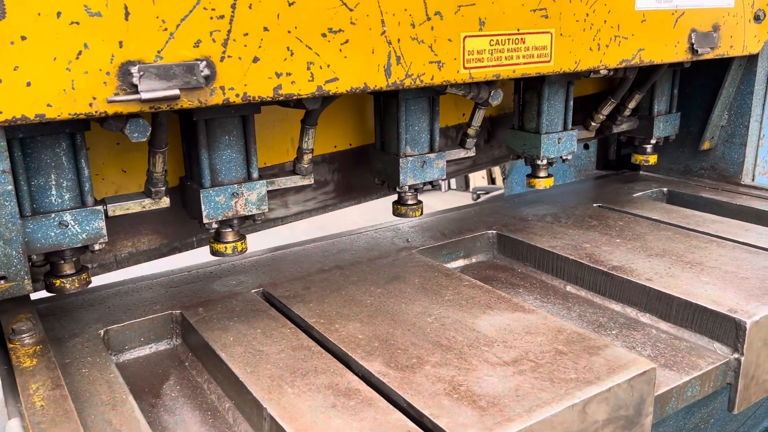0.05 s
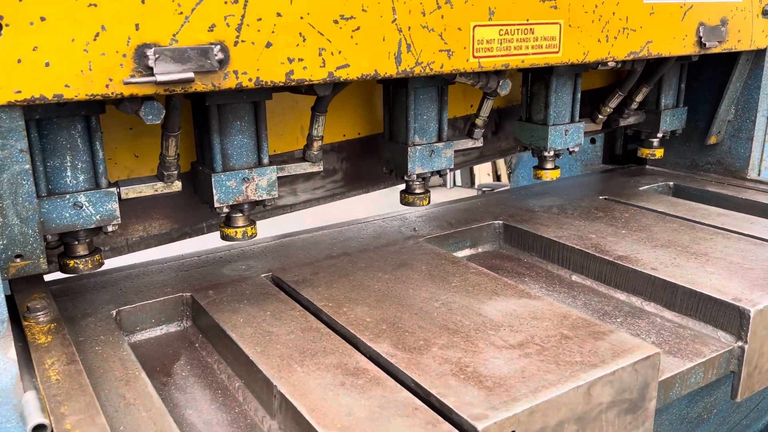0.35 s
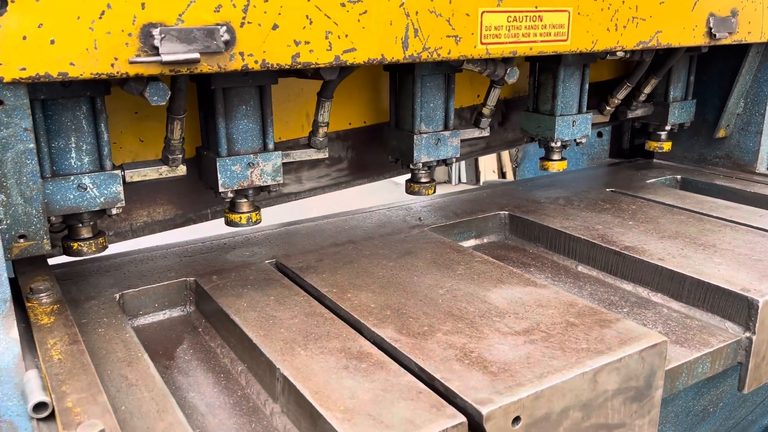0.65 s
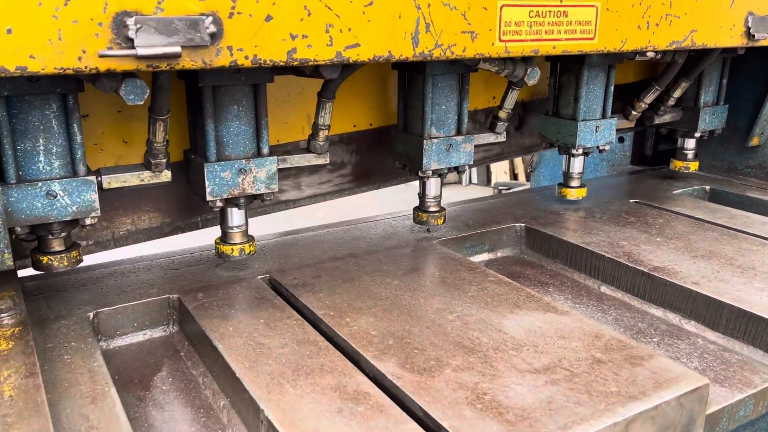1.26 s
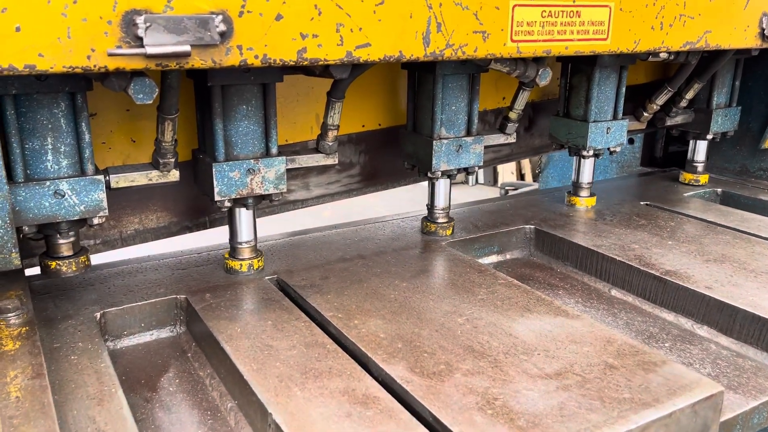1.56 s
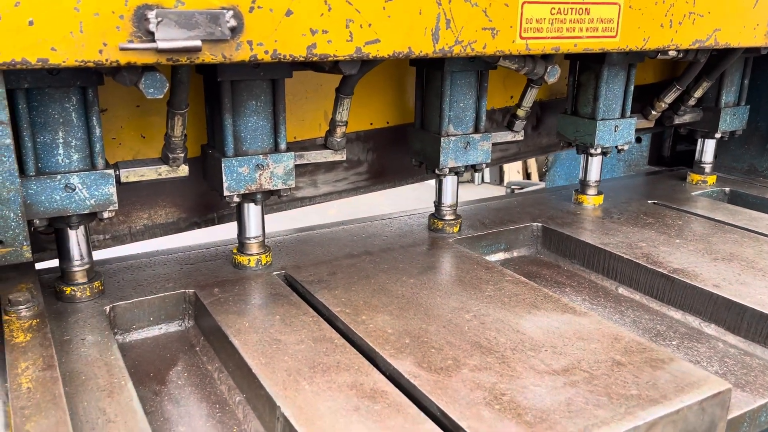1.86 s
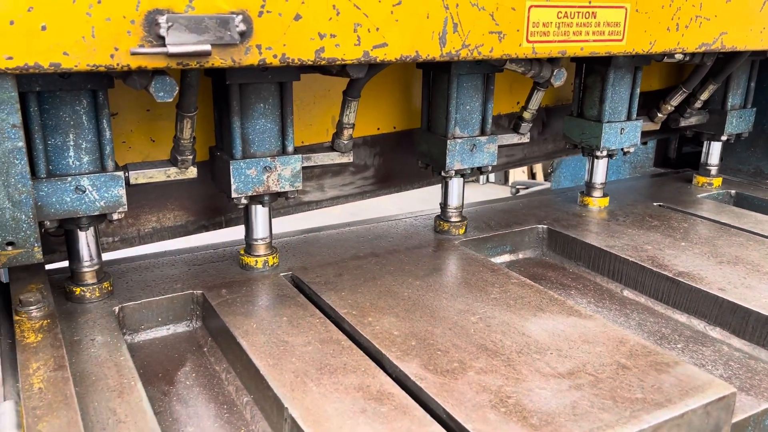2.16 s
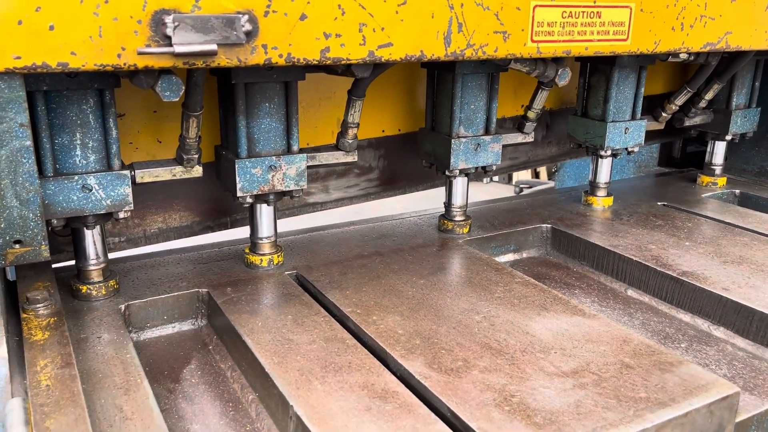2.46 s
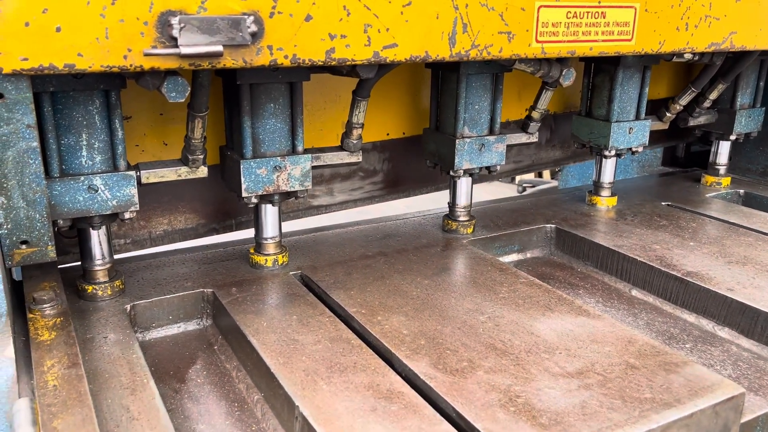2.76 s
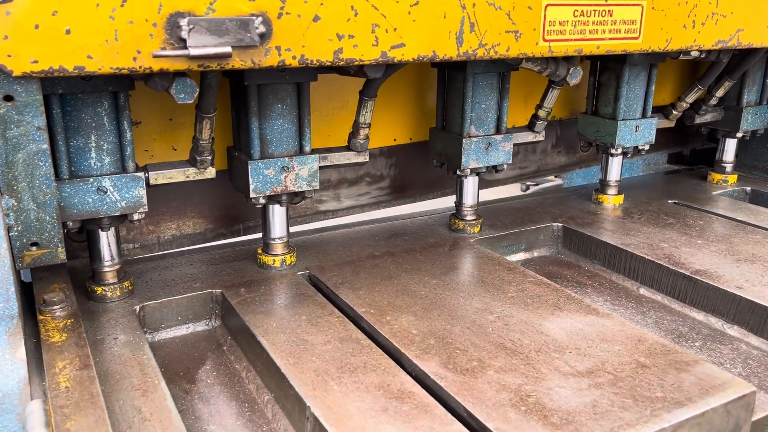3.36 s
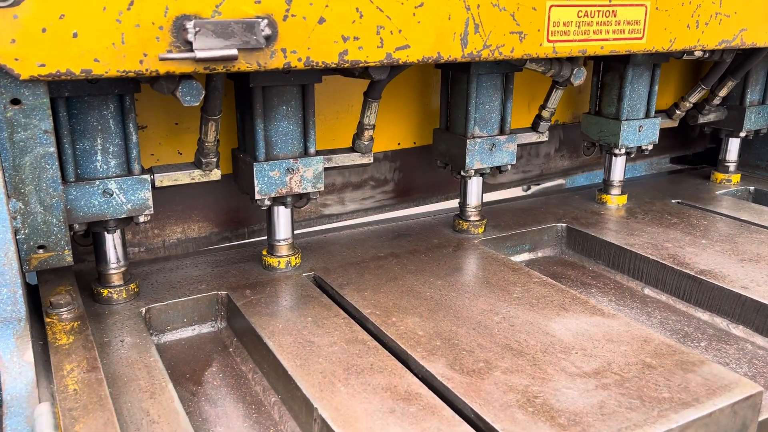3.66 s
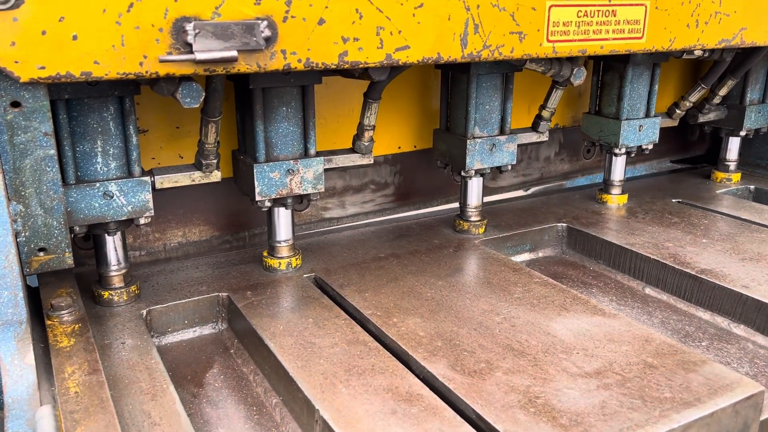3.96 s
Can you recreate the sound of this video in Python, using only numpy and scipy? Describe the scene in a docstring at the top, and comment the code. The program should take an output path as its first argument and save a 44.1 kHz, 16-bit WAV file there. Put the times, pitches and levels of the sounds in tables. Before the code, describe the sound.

Hydraulic pump hum, a quick run of steel clacks, then humming with a thin hiss.

```python
"""Hydraulic plate shear in a workshop.

A seven-piston pump hums at idle, then a valve shifts with a knock and oil drives the hold-down feet,
which clack one after another onto the steel table. The hum dips as the last one lands, then the pump
labours at clamping pressure while oil hisses through the relief valve."""
import sys
import numpy as np
from scipy import signal
from scipy.fft import rfft, irfft
from scipy.io import wavfile

SR = 44100
rng = np.random.default_rng(int(sys.argv[2]) if len(sys.argv) > 2 else 0)


def int16_out(signal):
    """Quantize to a 16-bit WAV file."""
    q = np.round(np.clip(np.atleast_2d(signal).T, -1, 1) * 32767)
    wavfile.write(sys.argv[1], SR, q.astype(np.int16))


N = 176400
T, FREQS = np.arange(N) / SR, np.fft.rfftfreq(N, 1 / SR)

VALVE_S, LANDED_S, RELIEF_S, PRESSURE_S, SWITCH_S = 0.832, 1.758, 1.92, 1.94, 0.02
MID_CLAMP_S = (PRESSURE_S + T[-1]) / 2
IDLE_HZ, STROKE_HZ, CLAMP_HZ = 29.875, 29.69, 29.235  # shaft speeds
PISTONS = 7
# Stereo width. Each row: frequency in Hz, side over mid in dB.
WIDTH = [(60,-25),(400,-18),(700,-6.5),(1400,-7.5),(2400,-2.5),(4500,-8),(9000,-3),(12000,0)]


def pump(shaft_rad, idle, stroke, clamp, count=190):
    """Shaft harmonics; those around each piston harmonic swing with it, so the hum throbs once a turn."""
    # Main tones: multiples of 7 are the piston beat, the rest come from unequal pistons.
    # Each entry, keyed by shaft multiple: base level in dB at idle, stroke, clamp.
    tones = {7: (-34.5,-34.5,-56), 11: (-37.5,-38.5,-43), 12: (-36.5,-33.5,-40), 13: (-41.5,-37,-41.5),
             14: (-26,-21.3,-23.9), 15: (-40,-40.5,-40.5), 18: (-39.5,-43,-52), 19: (-45,-40,-40),
             21: (-45.5,-38,-39.5), 27: (-59,-70,-42), 28: (-31,-36.5,-38), 34: (-39.5,-38,-40.5),
             35: (-40.5,-31.5,-39), 36: (-67,-36,-41), 42: (-78,-32.3,-49), 47: (-48,-41,-42.5),
             48: (-46.5,-39.5,-58), 49: (-31.5,-26.3,-43), 56: (-33,-38.5,-46.5), 63: (-41.5,-48,-54),
             70: (-48,-40,-63), 77: (-51,-54,-50), 84: (-57,-56,-53.5), 91: (-69,-57,-52),
             105: (-52,-50,-59)}
    # Spectrum of the other multiples. Each row: frequency in Hz, base level in dB.
    weak_tones = [(150,-57.5),(240,-60.5),(330,-49.5),(600,-49),(850,-77.5),(1500,-53.5),(2500,-69),(3700,-65),(4400,-76)]
    slip_rad, scatter_db, piston_lift_db = 0.091, 4, 5
    flutter_depth, flutter_doubles_hz, right_delay_s = 0.065, 1120, 2e-5
    harden_db_per_s, harden_above_hz = 0.9, 1200
    beat_rad = rng.uniform(0, 2 * np.pi, count)
    wavers = [walk(12) for _ in range(PISTONS + 1)]
    hardened = clamp * undb(harden_db_per_s * (T - MID_CLAMP_S))
    out = np.zeros((2, N))
    wave = spin = np.exp(1j * shaft_rad)
    for k, draw in enumerate(rng.standard_normal((count, 5)), 2):
        wave = wave * spin
        hz = k * CLAMP_HZ
        if k in tones:
            gains = undb(tones[k])
            phase = beat_rad[round(k / PISTONS)] + slip_rad * (k / PISTONS) ** 2 * draw[0]
        else:
            offset_db = scatter_db * np.clip(draw[2:], -2, 1.5) + piston_lift_db * (k % PISTONS == 0)
            gains = colour(weak_tones, hz) * undb(offset_db)
            phase = np.pi * draw[0]
        flutter = 1 + flutter_depth * (1 + hz / flutter_doubles_hz) * wavers[k % len(wavers)]
        held = hardened if hz > harden_above_hz else clamp
        amplitude = (gains[0] * idle + gains[1] * stroke + gains[2] * held) * flutter * np.sqrt(2)
        spread_rad = np.arctan(colour(WIDTH, hz)) * np.sign(draw[1]) + np.pi * hz * right_delay_s
        out[0] += amplitude * (wave * np.exp(1j * (phase + spread_rad))).imag
        out[1] += amplitude * (wave * np.exp(1j * (phase - spread_rad))).imag
    return out


def feet():
    """Steel meets steel: a dense crash, a few ringing modes and a faint workshop tail."""
    # Contacts. Each row: start in seconds, level in dB, crash t60 in seconds, EQ in dB at 2.5 and 6 kHz.
    clacks = [(0.765,-27,0.051,21,1.5),(0.83,-34.5,0.15,22,9),(1.474,-23.5,0.19,3,1.5),(1.4945,-17.5,0.067,8,1.5),(1.559,-11.5,0.077,-15,2),(1.6104,-13.5,0.071,6.5,2),(1.617,-20.5,0.097,31,22.5),(1.747,-13.5,0.033,-2,10),(1.7524,-8.5,0.031,5.5,7.5),(1.856,-37,.14,-5,3)]
    # Steel contact spectrum. Each row: frequency in Hz, gain in dB.
    steel = [(1000,-15),(4000,-14),(7200,-10.5),(8300,-1.5),(9600,-3.5),(10600,-11.5),(12300,-11),(15500,-45)]
    # Foot modes. Each row: frequency in Hz, relative level in dB.
    modes = [(2330,0),(3720,-1),(4947,-1),(6352,1.5),(7714,-2),(8300,0),(9205,-7)]
    attack_s, ring_db, tail_db, detune = 0.00056, -7.5, -22, 0.01
    out = 0
    for start_s, db, t60_s, low_db, mid_db in clacks:
        eq = [(1000, 0), (2500, low_db), (6000, mid_db), (8500, 0.0034)]
        tail = undb(tail_db) * strike(start_s, attack_s=0.0092, t60_s=0.33)
        crash = noise(colour(steel) * colour(eq)) * (strike(start_s, attack_s, t60_s) + tail)
        ring = 0
        for hz, mode_db in modes:
            cycles = hz * (1 + detune * rng.standard_normal()) * T + rng.random()
            ring += undb(mode_db) * colour(steel, hz) * colour(eq, hz) * np.sin(2 * np.pi * cycles)
        ring = undb(ring_db) * unit(ring) * strike(start_s, attack_s, t60_s=0.11)
        out += undb(db) * (crash + ring)
    return reflections(out, pan_db=2.8)


def knocks():
    """Jumps of oil pressure shake the frame: a ringing panel and a dull thud."""
    # Pressure jumps. Each row: start in seconds, level in dB, t60 in seconds, panel ring in Hz,
    # thud over ring in dB.
    jumps = [(0.839,-18,0.6,300,9),(1.48,-22.5,0.39,190,3),(1.512,-10,.075,235,-2),(1.563,-17,.09,300,3),(1.576,-13.5,.22,178,-4),(1.618,-20.5,.12,560,3),(1.649,-18,0.14,182,-3),(1.725,-24.5,.42,182,-4),(2.482,-28.5,.13,1500,1),(2.498,-22.5,0.068,320,-6)]
    # Thud spectrum. Each row: frequency in Hz, gain in dB.
    thud_spectrum = [(30,-42),(110,-9),(160,1),(400,4.5),(650,0),(900,-5),(2300,-14.5),(6000,-67)]
    pitch_wander = 0.0305
    out = 0
    for start_s, db, t60_s, hz, thud_db in jumps:
        panel_hz = hz * (1 + pitch_wander * walk(40))
        panel = unit(np.sin(2 * np.pi * np.cumsum(panel_hz) / SR))
        thud = undb(thud_db) * noise(colour(thud_spectrum))
        out += undb(db) * strike(start_s, 0.0052, t60_s) * unit(panel + thud)
    return reflections(out, pan_db=2)


def oil(shaft_rad, free, held):
    """Flow noise whose treble pulses with the pistons and the shaft, over the rumble of the hoses."""
    # Rush of oil and shaking panels, before and under pressure. Each row: frequency in Hz, gain in dB.
    free_spectrum = [(20,-26),(45,-12),(60,1.5),(120,-1.5),(260,-3.5),(370,-3),(750,-6),(1400,-9),(2300,-19.5),(3500,-27),(6500,-33.5),(8800,-27.5),(9600,-28.5),(10300,-61.5)]
    held_spectrum = [(20,-27),(50,-1.5),(80,0.5),(160,-1.5),(240,-6),(350,4),(600,-5.5),(850,-4),(1400,-11.5),(2100,-20.5),(2900,-25),(3700,-23.5),(5000,-27),(6500,-28.5),(10000,-17.5),(14000,-70)]
    # Hose rumble as the cylinders fill. Each row: time in seconds, level in dB.
    rumble_curve = [(0,-52),(.6,-52),(.75,-40),(1.35,-35),(1.5,-46),(1.73,-39)]
    free_db, held_db = -28.5, -33
    squeezed = noise(colour(held_spectrum))
    bass = squeezed - highpass(squeezed, hz=123)
    squeezed -= (1 - ramp(RELIEF_S, SWITCH_S)) * bass  # bass enters as the relief valve opens
    rush = undb(free_db) * free * noise(colour(free_spectrum)) + undb(held_db) * held * squeezed
    pulsing = 0.13 * np.cos(PISTONS * shaft_rad) + 0.056 * np.cos(shaft_rad)
    rumble_db = np.interp(T, *np.array(rumble_curve).T)
    rumble = free * undb(rumble_db) * noise(resonance(hz=57.7, width_hz=6.2))
    return reflections(rush + highpass(rush, hz=600) * pulsing + rumble, pan_db=2)


def relief_valve():
    """A thin jet of oil sings in narrow resonances; the lower ones grow as pressure holds."""
    # Valve resonances. Each row: centre in Hz, width in Hz, opening level in dB, growth in dB per
    # second, phase between the channels in radians.
    bands = [(9680,220,-35.5,1.5,2.36),(9380,220,-43,5.2,1.69),(8840,530,-51,6.3,0.49),(11250,800,-46,-3,1.34)]
    flicker_db = 1.44
    age_s = np.maximum(T - RELIEF_S, 0)
    jet = 0
    for hz, width_hz, db, db_per_s, phase_rad in bands:
        spread = np.exp(0.5j * phase_rad * np.array([[-1], [1]]))
        band = signal.hilbert(noise(resonance(hz, width_hz))) * spread
        jet += undb(db + db_per_s * age_s) * band.real
    return jet * ramp(RELIEF_S, 0.025) * undb(flicker_db * walk(25.37))


def reflections(x, pan_db, taps=800):
    """Echoes off the machine differ left and right."""
    echo = rfft(rng.standard_normal(taps) * np.hanning(2 * taps)[taps:], N)
    width = colour(WIDTH)
    side = width * echo / np.sqrt(np.mean(abs(echo) ** 2))
    response = np.array([1 + side, 1 - side]) / np.sqrt(1 + width ** 2)
    return irfft(rfft(x) * response, N) * pan(pan_db)


def undb(db):
    """Decibels to gain."""
    return 10 ** (np.asarray(db) / 20)


def unit(x):
    """Scale to rms 1."""
    return x / np.sqrt(np.mean(x ** 2))


def colour(points, hz=FREQS):
    """Gain of a (Hz, dB) curve."""
    points_hz, db = np.array(points).T
    return undb(np.interp(np.log(np.maximum(hz, 1)), np.log(points_hz), db))


def resonance(hz, width_hz):
    """Gain of a steep resonance."""
    return 1 / (1 + ((FREQS ** 2 - hz ** 2) / (np.maximum(FREQS, 1) * width_hz)) ** 2 / 2)


def highpass(x, hz):
    """Zero phase, 24 dB per octave."""
    return irfft(rfft(x) * FREQS ** 4 / (FREQS ** 4 + hz ** 4), N)


def noise(gain):
    """Noise of rms 1 with a given spectrum."""
    return unit(irfft(rfft(rng.standard_normal(N)) * gain, N))


def walk(rate_hz):
    """Slow random drift, spread near 1."""
    return np.interp(T * rate_hz, np.arange(256), rng.standard_normal(256))


def ramp(centre_s, length_s):
    """Smooth step from 0 to 1."""
    return 0.5 + 0.5 * np.sin(np.pi * np.clip((T - centre_s) / length_s, -0.5, 0.5))


def strike(start_s, attack_s, t60_s):
    """Linear rise, exponential fall."""
    age_s = np.maximum(T - start_s, 0)
    return np.minimum(age_s / attack_s, 1) * np.exp(-np.log(1000) * age_s / t60_s)


def pan(db):
    """Channel gains, left over right in dB."""
    return undb(np.vstack([db, -db]) / 2)


def scene():
    """Idle, stroke, clamp: the shaft slows a little at each step of load."""
    dip_db, build_s, fade_db_per_s = -4.5, 0.24, -0.98
    free_pan_db, held_pan_db = 2.4, 1.1
    shifted, clamp = ramp(VALVE_S, SWITCH_S), ramp(LANDED_S, SWITCH_S)
    idle, stroke = 1 - shifted, shifted - clamp
    effort_db = dip_db * (1 - ramp(PRESSURE_S, build_s)) + fade_db_per_s * (T - MID_CLAMP_S)
    held = clamp * undb(effort_db)
    shaft_rad = 2 * np.pi * np.cumsum(IDLE_HZ * idle + STROKE_HZ * stroke + CLAMP_HZ * clamp) / SR
    hum = pump(shaft_rad, idle, stroke, held) * pan(free_pan_db * (1 - clamp) + held_pan_db * clamp)
    return hum + oil(shaft_rad, idle + stroke, held) + knocks() + feet() + relief_valve()


def record(dry):
    """Steep low-pass."""
    cutoff_hz = 15900
    return signal.sosfilt(signal.ellip(8, 0.2, 70, cutoff_hz, fs=SR, output="sos"), dry)


dry = scene()
out = record(dry)
int16_out(out)
```